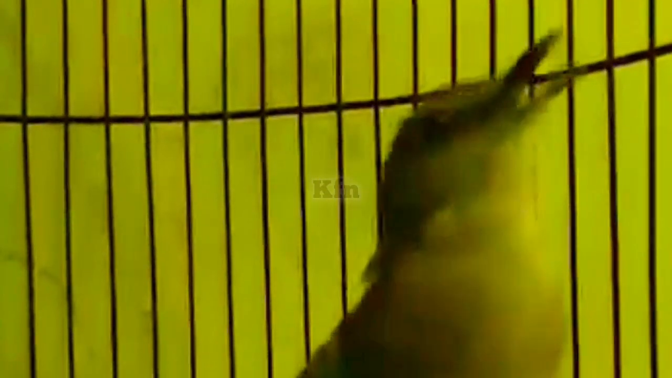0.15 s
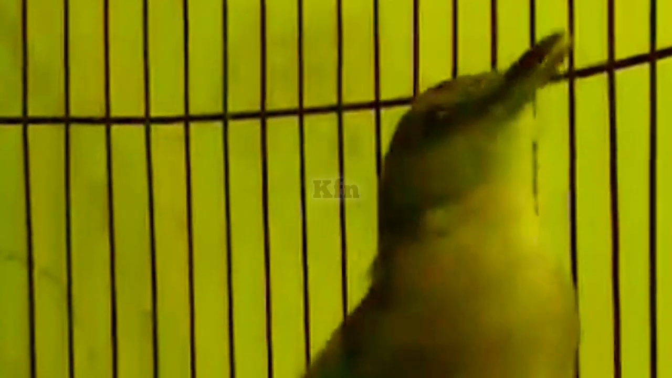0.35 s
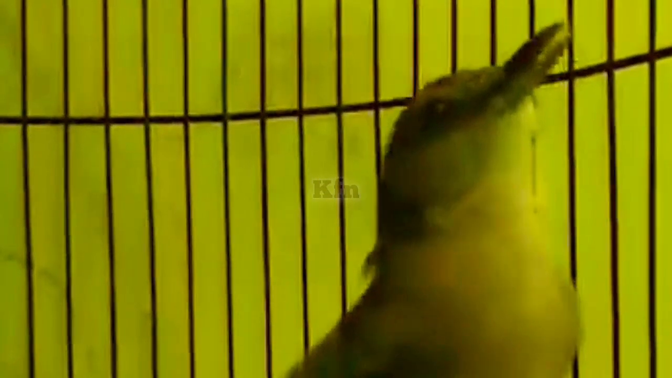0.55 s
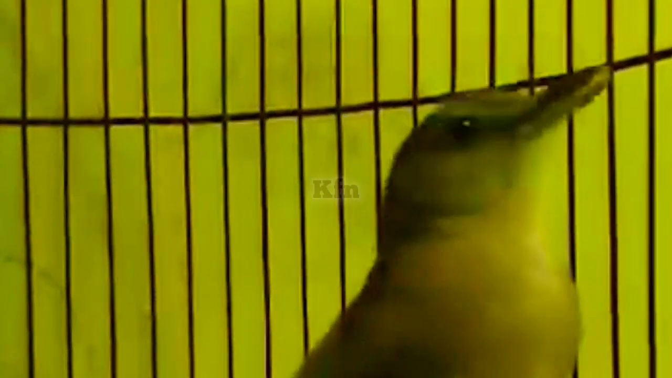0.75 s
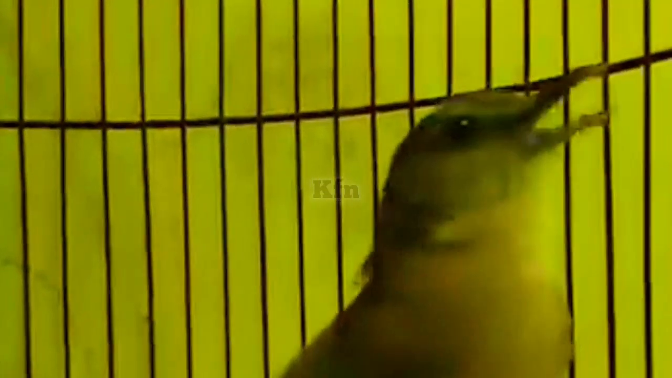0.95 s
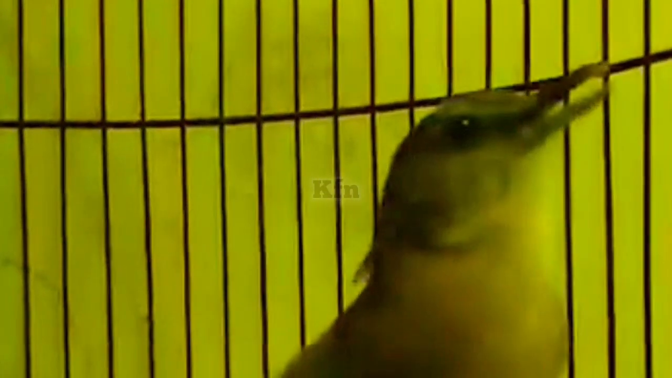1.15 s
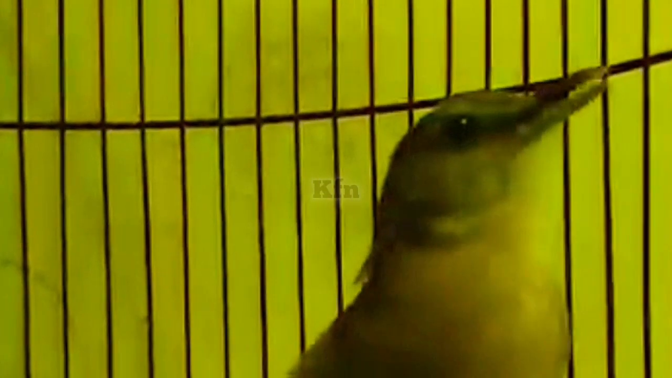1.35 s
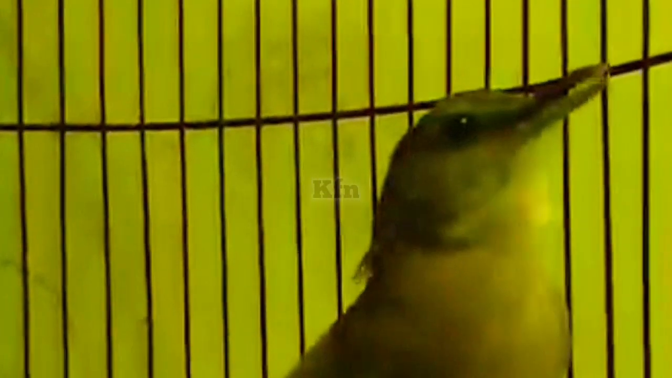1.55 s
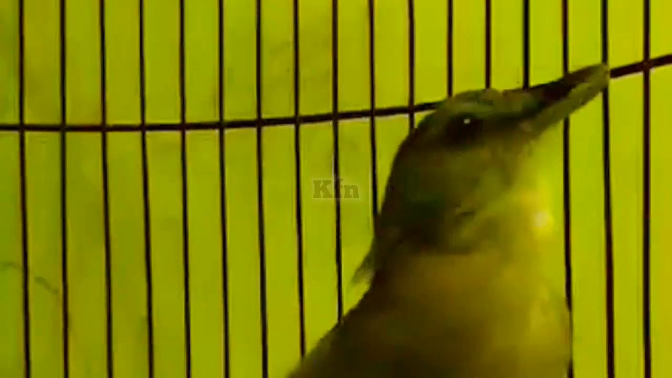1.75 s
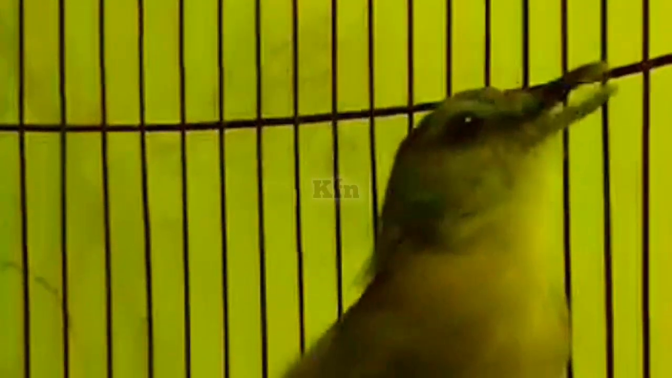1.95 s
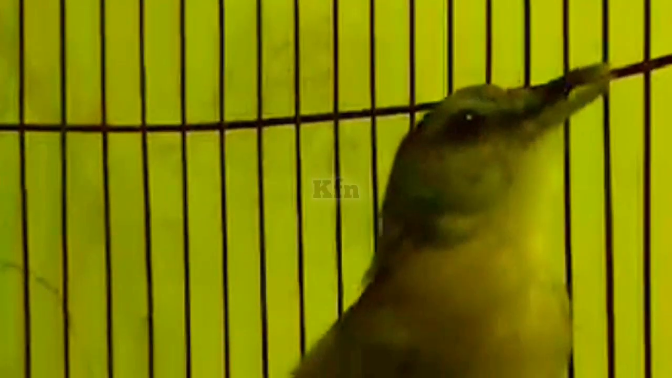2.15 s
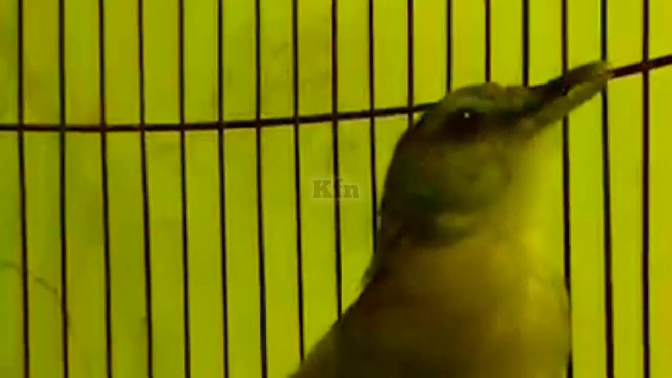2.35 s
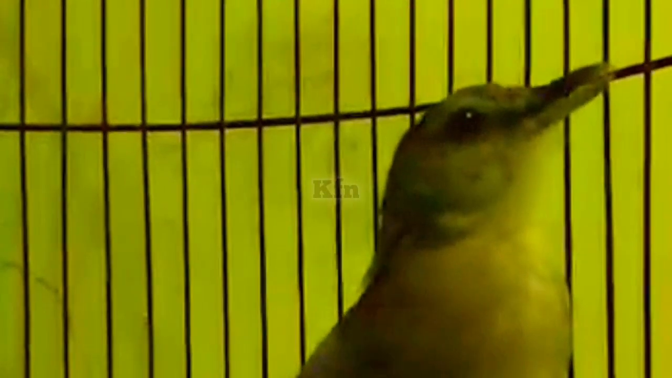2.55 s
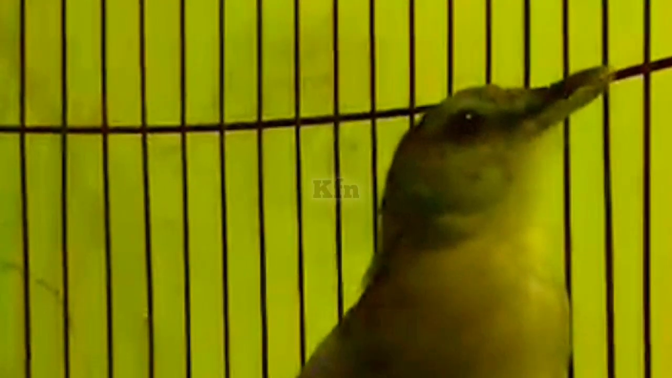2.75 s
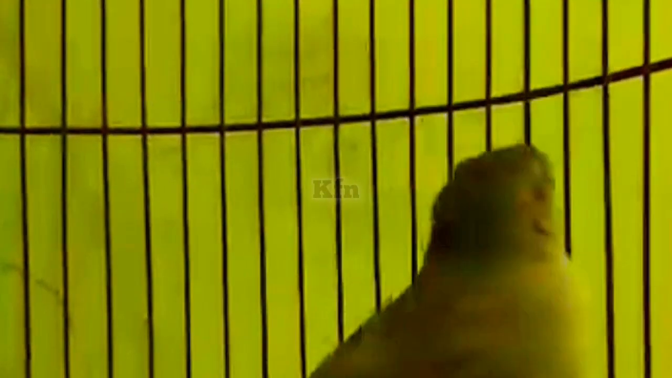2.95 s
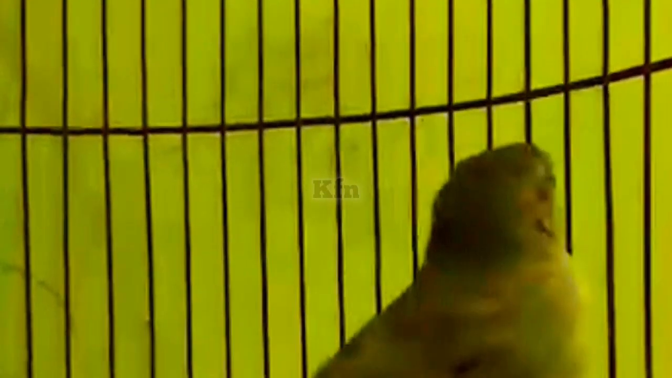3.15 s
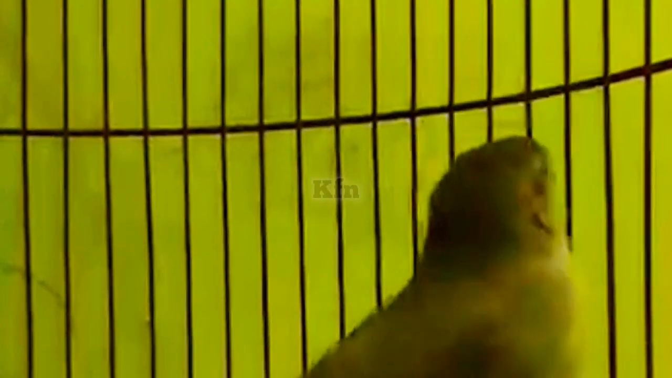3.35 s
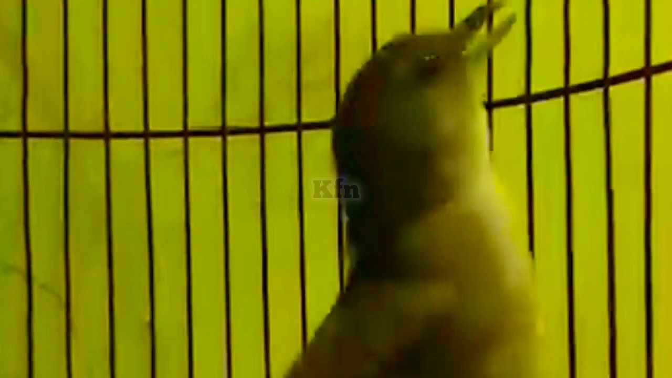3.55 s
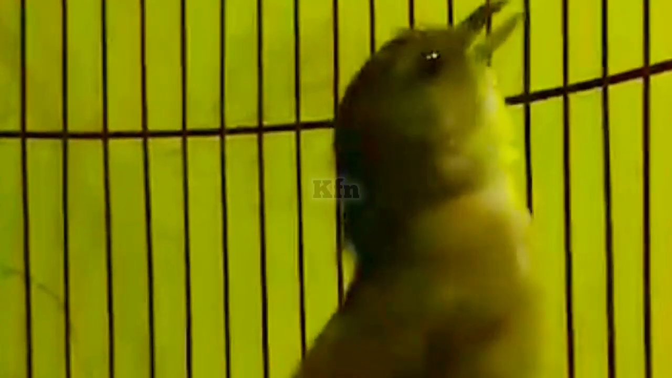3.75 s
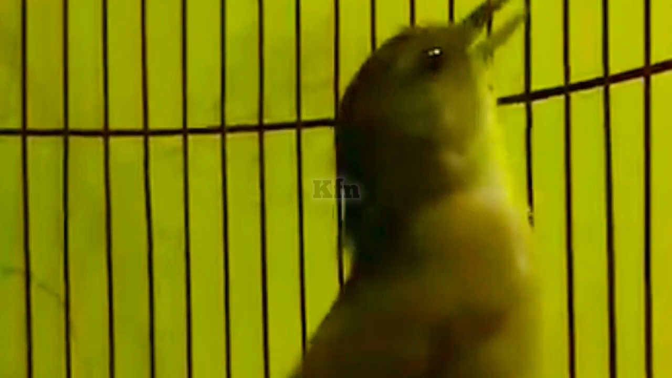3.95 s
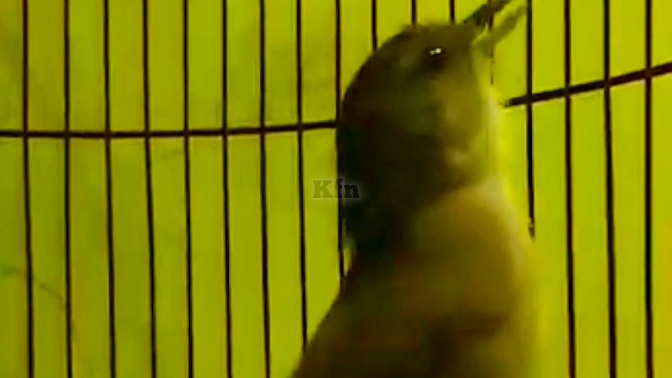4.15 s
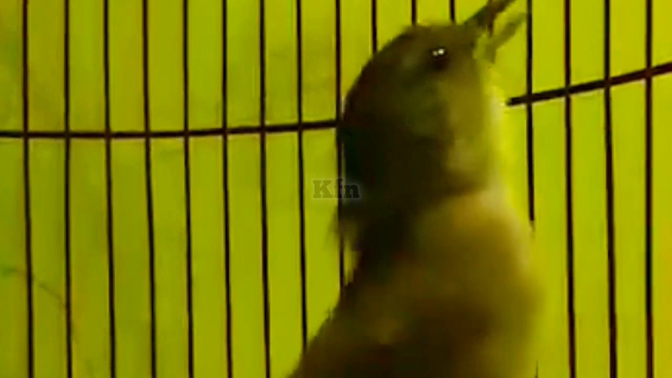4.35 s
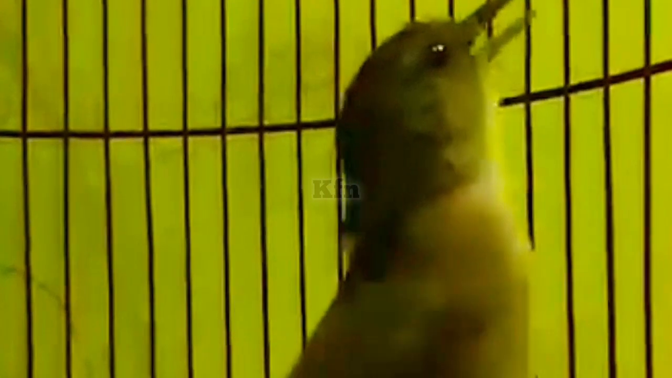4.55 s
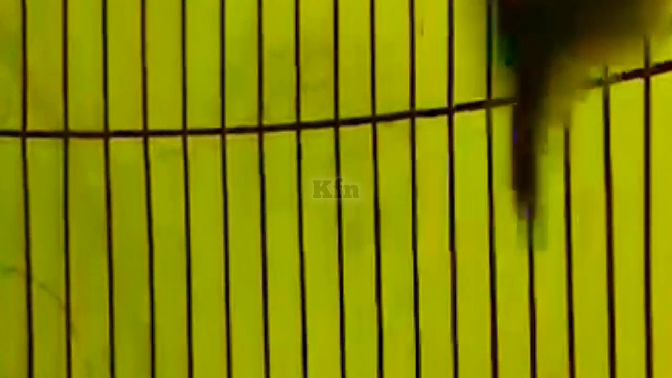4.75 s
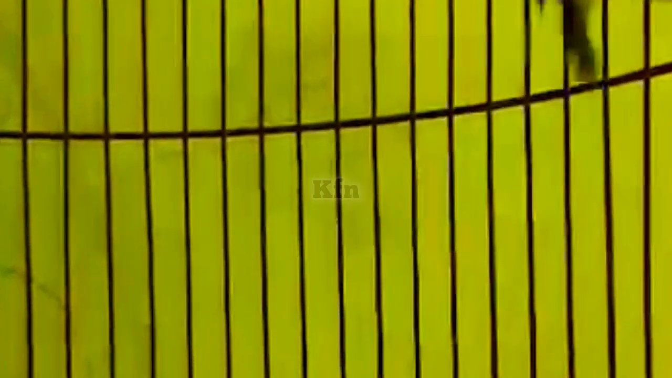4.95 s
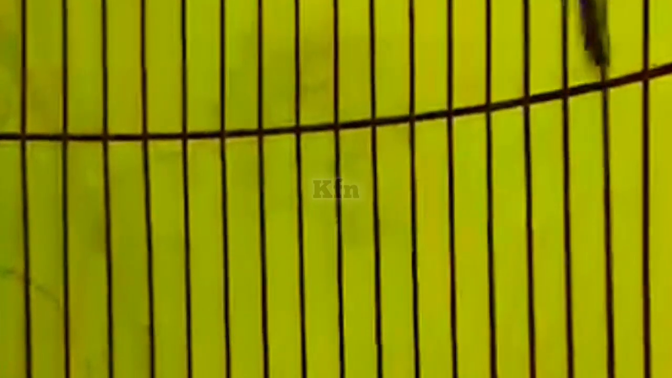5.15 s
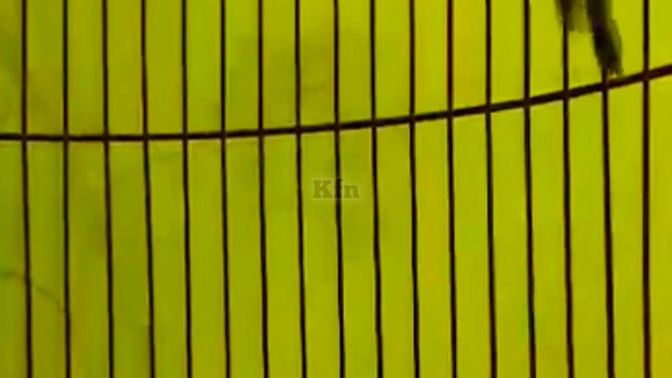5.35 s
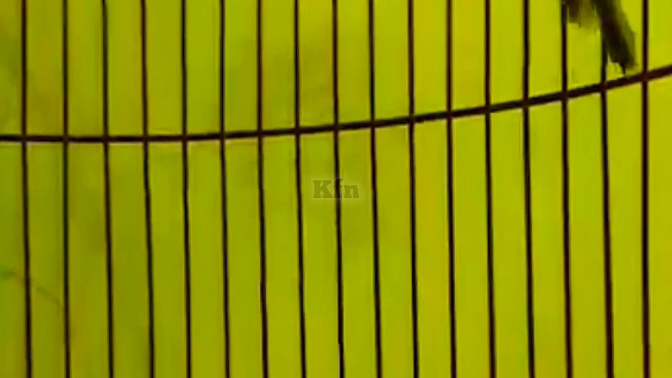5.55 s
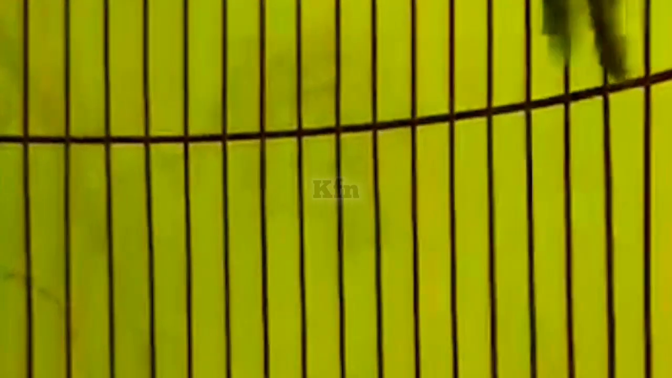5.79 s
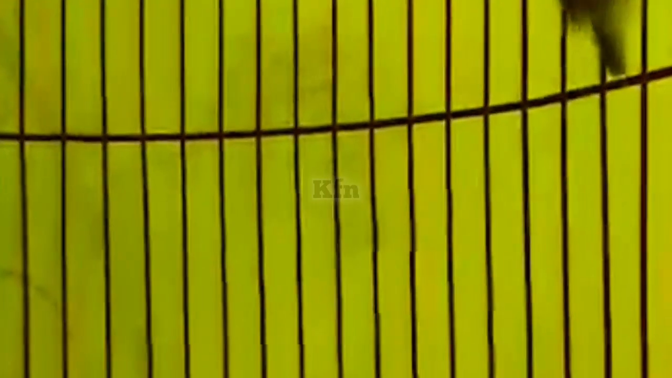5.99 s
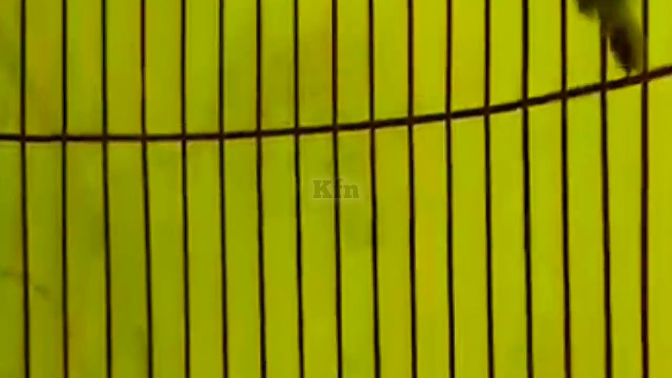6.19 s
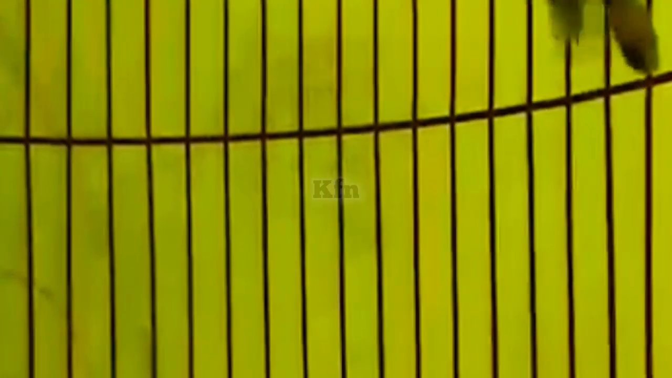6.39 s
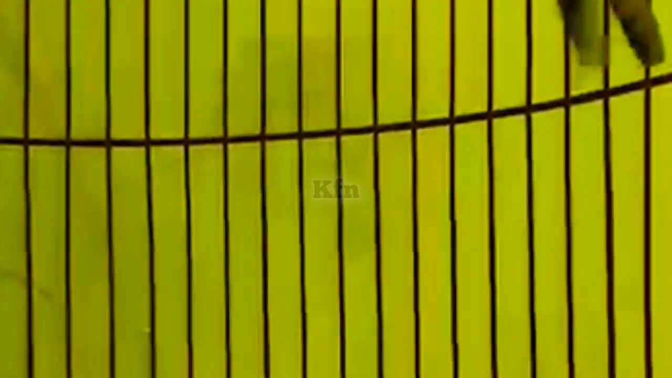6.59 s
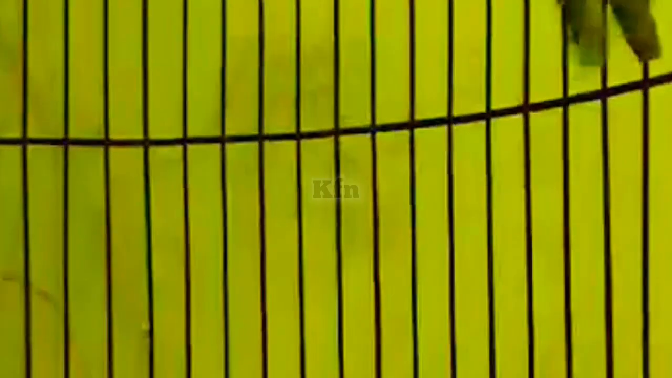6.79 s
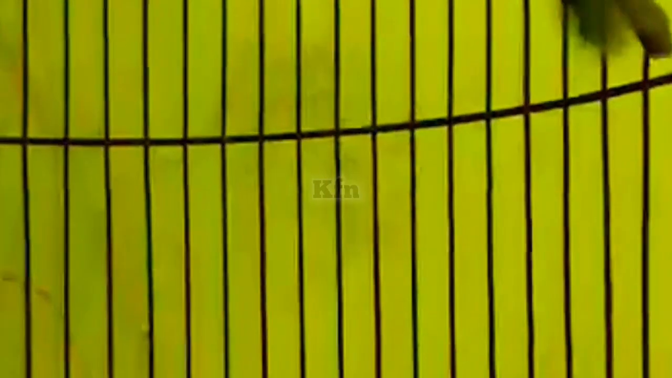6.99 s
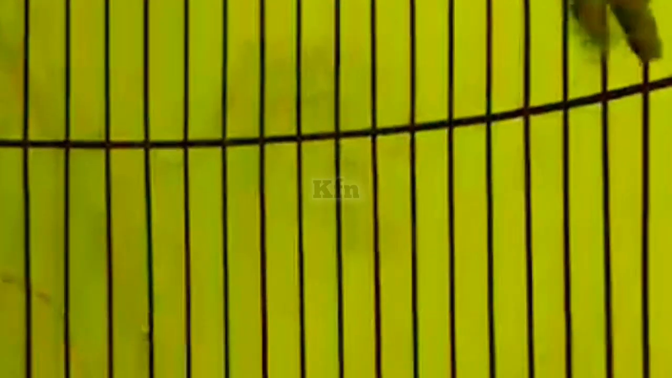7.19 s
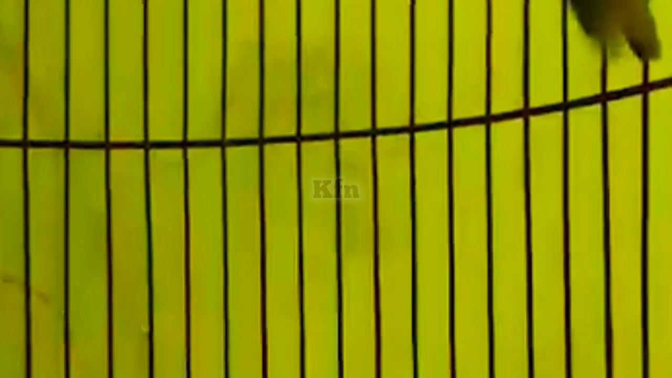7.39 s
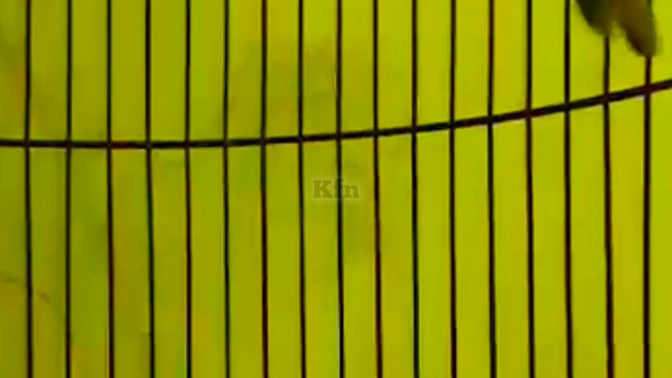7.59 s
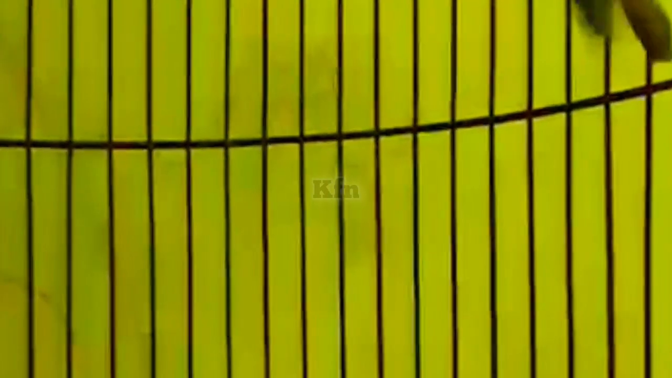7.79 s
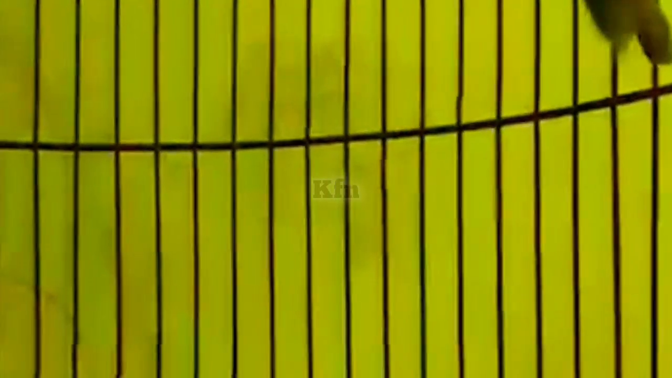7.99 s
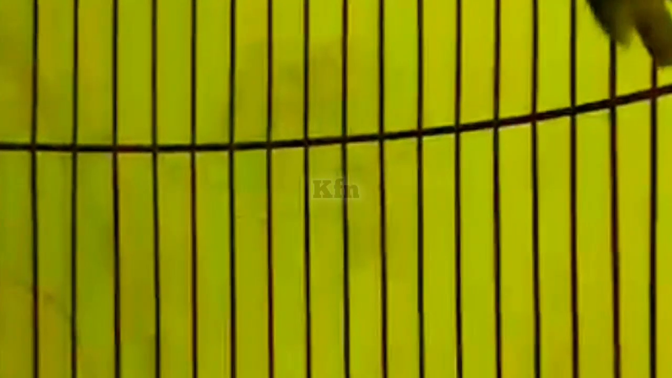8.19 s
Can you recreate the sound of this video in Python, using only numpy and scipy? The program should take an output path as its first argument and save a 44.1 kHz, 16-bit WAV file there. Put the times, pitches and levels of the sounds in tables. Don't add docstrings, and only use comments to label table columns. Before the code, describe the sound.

A small caged bird whistles close to the microphone in a hard, echoing room. A clear rising note opens at 0 s, a short low drop follows at 0.5, a flicked falling whistle at 1.0 and a dipping, climbing one at 1.6. Faint distant birds give short slurs between about 2 and 3 s. Two dull, quick chips come at 3.4, then a humped falling note at 3.7 with rustle and a tiny overload crackle, and a strong rise at 4.2. From 4.75 to 5.15 the bird hops: claws scratch, wires clank, and the cage hums faintly afterwards. A low drop follows at 5.2, a loud stepped fall at 5.6, a strong dip-and-rise at 6.1, a long fall at 6.9 and a soft drop at 7.8. Distant chirps answer near 8 s. Quiet chatter, feather rustle and a low machine drone surging through the wall lie underneath.

```python
import sys
import numpy as np
from scipy import signal
from scipy.fft import rfft, irfft, next_fast_len
from scipy.io import wavfile
from scipy.ndimage import uniform_filter1d, minimum_filter1d, map_coordinates

SR = 44100
rng = np.random.default_rng(int(sys.argv[2]) if len(sys.argv) > 2 else 0)


def gain_from_decibels(decibels):
    exponent = np.asarray(decibels, float) / 20
    return 10 ** exponent


def bounce(signal):
    frames = np.transpose(np.atleast_2d(signal))
    limited = np.clip(frames, -1, 1)
    pcm = np.round(limited * 32767).astype(np.int16)
    wavfile.write(sys.argv[1], SR, pcm)


N = 362943

# [t/s, f/Hz]
RISERS = [
    [(-.03, 1771), (0, 1939), (.03, 2087), (.11, 2451), (.145, 2692), (.19, 2821)],
    [(1.597, 2129), (1.63, 2014), (1.7, 1850), (1.73, 1681), (1.765, 1745), (1.795, 1667), (1.87, 2270),
     (1.92, 2395), (1.955, 2266)],
    [(4.24, 2043), (4.32, 1935), (4.37, 1928), (4.41, 2128), (4.46, 2316), (4.5, 2532), (4.555, 2535)],
    [(6.138, 2023), (6.18, 1933), (6.23, 2009), (6.33, 2310), (6.375, 2459), (6.405, 2717), (6.425, 2646)],
]
# [level/dB, swell/dB after 1/3, 2/3 and all of the note, top overtone gain/dB]
RISER_PUSH = [
    (-10.5, -1.5, -3, -3.5, 13),
    (-10.5, -3.5, 3, -5.5, 2),
    (-7, -2, -4.5, -9.5, 3.6),
    (-5.5, -5.5, -9, -13, 11),
]


def risers():
    return sing(RISERS, RISER_PUSH, attack=.019, opening=0.84, release=0.028, close=.9)


# [t/s, f/Hz]
FALLERS = [
    [(.962, 2774), (.995, 2711), (1.022, 3214), (1.065, 2599), (1.095, 2576), (1.115, 2244), (1.145, 2372),
     (1.193, 2445)],
    [(3.69, 2687), (3.727, 2580), (3.741, 2940), (3.762, 3113), (3.782, 2726), (3.815, 2564), (3.86, 2387),
     (3.916, 2463)],
    [(5.584, 3047), (5.61, 2783), (5.65, 2923), (5.71, 2515), (5.745, 2335), (5.785, 2564), (5.803, 2558)],
    [(6.905, 3036), (6.935, 2586), (6.985, 2541), (7.015, 2416), (7.05, 2190), (7.07, 2322), (7.105, 2360)],
]
# [level/dB, swell/dB after 1/3, 2/3 and all of the note, top overtone gain/dB]
FALLER_PUSH = [
    (-7, -9, -8.5, -5, 5),
    (-13.5, 5, 0.5, 0, -11.5),
    (-4.5, -2, -12.5, -5, 2.5),
    (-21.5, 5.5, 6, 4.5, -19),
]


def fallers():
    return sing(FALLERS, FALLER_PUSH, attack=.011, opening=0.95, release=0.011, close=0.69)


# [t/s, f/Hz]
DROPS = [
    [(.51, 2319), (.535, 2211), (.56, 1837), (.59, 1573)],
    [(5.238, 2348), (5.255, 2289), (5.275, 2058), (5.3, 1600), (5.32, 1447), (5.35, 1400)],
    [(7.815, 2270), (7.845, 1999), (7.87, 1748), (7.9, 1577)],
]
# [level/dB, swell/dB after 1/3, 2/3 and all of the note, top overtone gain/dB]
DROP_PUSH = [
    (-17, 3.72, 3.6, 0.5, 4),
    (-18, 5, 3.5, 11, 0),
    (-19, 2.6, 2.3, 8, -9),
]


def drops():
    return sing(DROPS, DROP_PUSH, attack=.021, opening=.88, release=0.016, close=0.73)


# [t/s, f/Hz]
CHIPS = [
    [(3.402, 2133), (3.415, 1930), (3.44, 1964)],
    [(3.47, 2113), (3.49, 1903)],
]
# [level/dB, swell/dB after 1/3, 2/3 and all of the note, top overtone gain/dB]
CHIP_PUSH = [
    (-17, -2.5, -5.5, -3.5, -29),
    (-11, 0, -1, -0.5, -18),
]


def chips():
    return sing(CHIPS, CHIP_PUSH, attack=.01, opening=1.2, release=0.019, close=0.76)


def sing(paths, pushes, attack, opening, release, close):
    out = np.zeros(N)
    for path, push in zip(paths, pushes):
        rows = phrase(path, push, attack, opening, release, close)
        note = whistle(rows, glide=.011, bright_db=push[-1], waver=.0035)
        add(out, rows[0][0], note)
        add(out, rows[0][0], gain_from_decibels(-4.5) * room(note, onset=0.018))
    return out


def phrase(path, push, attack, opening, release, close):
    faint_db = -27.5
    s, hz = np.transpose(path)
    breath_db = push[0] + np.interp(s, np.linspace(s[0], s[-1], num=4), [0, *push[1:-1]])
    level_db = breath_db + 26.5 * np.minimum(np.log2(hz / 2113), 0)
    first, last = level_db[0], level_db[-1]
    return [(s[0] - attack, opening * hz[0], first + faint_db),
            (s[0] - attack / 2, (1 + .3 * (opening - 1)) * hz[0], first + 0.35 * faint_db),
            *zip(s, hz, level_db),
            (s[-1] + release / 2, (1 + close / 2) / 1.5 * hz[-1], last + 0.81 * faint_db),
            (s[-1] + release, close * hz[-1], last + 0.84 * faint_db)]


OVERTONES = [-18.5, -28.5, -38, -45.5, -49.5, -61.5]
# [f/Hz, level/dB]
BEAK = [(1200, -24.5), (1600, -11), (2200, 4.5), (3000, 7), (3700, -5), (4500, -13.5), (5500, -5.5),
        (7500, -6.5), (10000, -4), (16000, -4.5)]


def whistle(rows, glide, bright_db, waver):
    s, hz, db = np.transpose(rows)
    t = np.arange(s[0], s[-1], 1 / SR)
    hz = np.interp(t, s, hz)
    hz = uniform_filter1d(hz, max(round(glide * SR), 1), mode="nearest")
    hz = hz * (1 + waver * wobble(len(t), 70.08))
    turn = 2 * np.pi * np.cumsum(hz) / SR
    tone = np.sin(turn)
    open_db = bright_db + 22 * np.log2(hz / 2300)
    open_db = open_db - 26 * np.exp(-(t - s[0]) / 0.022)
    for k, level in enumerate(OVERTONES, 2):
        level = level + open_db * (k - 1) / len(OVERTONES)
        level = level + 1.1 * k * wobble(len(t), 40)
        beak_db = along(BEAK, k * hz) - along(BEAK, hz)
        breathy = 1 + .3 * (k - 1.3) * wobble(len(t), 260)
        audible = k * hz < SR / 2
        tone = tone + audible * gain_from_decibels(level + beak_db) * breathy * np.sin(k * turn)
    to_edge = np.minimum(t - s[0], s[-1] - t)
    edges = np.sin(np.pi / 2 * np.clip(to_edge / 0.002, 0, 1)) ** 2
    loudness = uniform_filter1d(np.interp(t, s, gain_from_decibels(db)), SR // 300, mode="nearest")
    return np.sqrt(2) * loudness * edges * tone


# [f/Hz, t60/s]
ROOM = [(300, 0.12), (1800, 0.45), (2400, 0.59), (3000, 0.46), (6000, 0.36), (10000, 0.42), (16000, 0.5)]
# [delay/s, level/dB]
WALLS = [(.004, -3.5), (.009, -1), (0.013, -4), (.021, -10.5), (0.025, -10.5), (.043, -9.5), (.058, -10.5),
         (.074, -12.5)]


def room(x, onset):
    hz, t, z = signal.stft(rng.standard_normal(SR * 3 // 4), SR, nperseg=256)
    decay = gain_from_decibels(-60 * t / along(ROOM, hz)[:, None])
    tail = signal.istft(z * decay, SR, nperseg=256)[1]
    tail = tail * (1 - np.exp(-np.arange(len(tail)) / SR / onset))
    tail = tail / np.linalg.norm(tail)
    for delay, db in WALLS:
        tail[round(delay * SR)] += gain_from_decibels(db - 2.5) * rng.choice([-1, 1])
    return signal.fftconvolve(x, tail)


# [t/s, peak level/dB, scratch level/dB, bright bars level/dB, frame level/dB]
HOPS = [(4.75, -25, -7, -24, 1), (4.824, -25, -3.5, -5, -9.5), (4.845, -21, -3, -5, -23),
        (4.874, -30, -7.5, -18.5, -16.5), (4.79, -38.5, 0.5, -12, -8.5), (4.905, -36, 2, -11, -8.5),
        (4.938, -31, -0.5, -32, -15), (4.969, -22.5, -2.5, -2, -22.5), (4.985, -21.5, -3.5, 10, -10),
        (4.998, -33.5, -11.5, 5, -11.5), (5.029, -42, -5.5, 1.5, -5), (5.07, -49, -7, -5.5, -5),
        (5.148, -40, 0, -8.5, -19.5)]
# [f/Hz, level/dB, t60/s]
BARS = [(2190, -5, .6), (3670, -2, .65), (5360, -4, .4), (7620, -9, .35), (9600, -14, .25)]
# [f/Hz, level/dB, t60/s]
FRAME = [(960, -2.5, 0.087), (1306, -10, 0.058), (1600, 5, 0.055), (1930, -24, 0.2), (505, -19.5, 0.26)]
# [f/Hz, level/dB per Hz]
SCRATCH = [(150, -56), (400, -17), (1000, -7.5), (2000, -4), (2700, -17.5), (3600, -7), (4400, -23.5),
           (9400, -25), (16000, -38.5)]


def hops():
    out, t = np.zeros(N), np.arange(SR // 4) / SR
    for s, db, scratch_db, bars_db, frame_db in HOPS:
        hit = np.zeros(SR * 2 // 5)
        add(hit, 0, gain_from_decibels(bars_db - 19) * ring(BARS, attack=.004, spread=.012, count=5))
        add(hit, 0, gain_from_decibels(frame_db - 0.5) * ring(FRAME, attack=0.0063, spread=0.015, count=3))
        scrape = (1 - np.exp(-t / .004)) * gain_from_decibels(-60 * t / .1 + 3 * wobble(len(t), 200))
        add(hit, 0, gain_from_decibels(scratch_db - 2.5) * scrape * noise(SCRATCH, len(t), patchy_db=-1.0))
        add(out, s, gain_from_decibels(db) * hit)
        add(out, s, gain_from_decibels(db - 5.0) * room(hit, onset=0.038))
    return out


# [f/Hz, level/dB, t60/s]
HUM = [(314, 8, 0.84), (337.3, 1.5, 2.08), (421, -7.5, 4.4), (1115, 0, 2.5)]
# [t/s, level/dB]
HUM_BLOWS = [
    (4.99, -48),
    (5.031, -47.5),
    (5.062, -49.5),
]


def cage_hum():
    out = np.zeros(N)
    for s, db in HUM_BLOWS:
        add(out, s, gain_from_decibels(db) * ring(HUM, attack=.006, spread=.022))
    return out


def ring(modes, attack, spread, count=4):
    longest = max(mode[2] for mode in modes)
    t = np.arange(round(.8 * SR * longest)) / SR
    tones = np.zeros(len(t))
    for hz, db, t60 in modes:
        bars = hz * (1 + spread * rng.standard_normal((count, 1)))
        waves = np.sin(2 * np.pi * (bars * t + rng.random((count, 1))))
        tones += gain_from_decibels(db - 5.0 - 60 * t / t60) * waves.sum(axis=0)
    return tones * (1 - np.exp(-t / attack))


# [t/s, length/s, start f/Hz, f/Hz at the loudest, level/dB]
FAR = [(0.846, 0.074, 2410, 1505, -49.5), (1.365, 0.052, 3380, 3470, -60), (1.927, 0.077, 2920, 2886, -54),
       (2.154, 0.043, 2760, 2626, -41.5), (2.399, 0.081, 2243, 1740, -42.5),
       (2.663, 0.075, 2360, 1725, -42.5), (2.898, 0.059, 2580, 1703, -41), (3.128, 0.33, 2730, 2970, -66),
       (0.908, 0.05, 600, 588, -64), (2.708, 0.071, 1320, 1317, -66), (0.093, 0.034, 1420, 1304, -57),
       (4.575, 0.056, 1401, 1363, -66), (6.006, 0.056, 1682, 1446, -50.5), (7.215, 0.015, 1535, 1400, -55),
       (7.49, 0.028, 1804, 1360, -55), (7.554, 0.018, 2460, 1770, -43), (8.044, 0.04, 2122, 1733, -34),
       (8.117, 0.023, 3010, 2317, -27.5), (8.171, 0.038, 2600, 2215, -39), (2.468, 0.022, 1860, 2260, -43),
       (2.722, .031, 1813, 2355, -39.5)]


def far_birds():
    out = np.zeros(N)
    for s, length, start, loudest, db in FAR:
        end = loudest + 0.11 * (loudest - start)
        rows = [(0, start, db - 8), (0.8 * length, loudest, db), (length, end, db - 10.5)]
        note = whistle(rows, glide=.008, bright_db=-60, waver=.012)
        add(out, s, gain_from_decibels(-0.5) * note)
        add(out, s, gain_from_decibels(-3.5) * room(note, onset=0.0054))
    return out


# [t/s, level/dB]
STIR = [(0, 11), (.3, -1.5), (1.9, 3), (2.2, 6.5), (2.7, 1), (3.1, -2), (3.58, 23.5), (3.95, 4.5),
        (4.72, 9.5), (5.0, 19), (5.5, 16.5), (5.65, 12), (6.8, -9.5), (7.15, 3), (7.5, -11), (7.75, 12),
        (8.23, 15)]
# [f/Hz, level/dB per Hz]
AIR = [(25, -17.5), (80, -19), (300, -13.5), (750, -26.5), (1230, -17), (1790, -15), (2410, 3), (2750, -17),
       (3700, -16.5), (4200, -35), (5280, -21.5), (6740, -40), (10000, -39), (16000, -59.5)]
# [f/Hz, level/dB]
HOLLOW = [(300, -51.5), (430, -8), (530, -0.5), (590, -4.5), (700, -54.5)]
# [f/Hz, level/dB]
FEATHERS = [(30, -12.5), (70, -12), (200, 2.5), (500, -5), (1000, -8), (4000, -17), (10000, -36.5),
            (16000, -48.5)]


def air():
    stir_db = curve(STIR)
    still = gain_from_decibels(0.28 * stir_db - 52.5) * noise(AIR, N, patchy_db=2.5)
    street = gain_from_decibels(0.6 * stir_db - 71) * noise(HOLLOW, N, patchy_db=2.0)
    rustle = gain_from_decibels(1.23 * stir_db - 80) * noise(FEATHERS, N, patchy_db=1.8)
    return still + street + rustle


# [t/s, level/dB]
SURGES = [(0, -61.5), (1.301, -64.5), (1.7, -64), (2.01, -62.5), (2.58, -69), (2.9, -70), (3.21, -66.5),
          (3.65, -52), (4.05, -63), (4.35, -62.5), (5.68, -67.5), (6.25, -66), (7.1, -74), (7.88, -69),
          (8.201, -67)]
# [f/Hz, level/dB]
DRONE = [(30, -31), (55, -17), (70, -4.5), (82, -19), (120, -40.5), (300, -86.5)]


def low_surges():
    t = np.arange(N) / SR
    half_hold_s, slope_db_per_s = 0.14, 88.5
    surges_db = [db - slope_db_per_s * np.maximum(abs(t - s) - half_hold_s, 0) for s, db in SURGES]
    return gain_from_decibels(np.max(surges_db, axis=0)) * noise(DRONE, N, patchy_db=-5.0)


def noise(spectrum, n, patchy_db):
    z = signal.stft(rng.standard_normal(n + 1024), nperseg=512)[2]
    field = uniform_filter1d(rng.standard_normal(z.shape), size=5, axis=0)
    field = uniform_filter1d(field, size=10, axis=1)
    white = signal.istft(z * gain_from_decibels(patchy_db * unit(field)), nperseg=512)[1]
    return unit(colour(white, spectrum)[:n])


def colour(x, spectrum):
    m = next_fast_len(x.shape[-1] + SR // 4)
    return irfft(rfft(x, m) * gain_from_decibels(along(spectrum, np.fft.rfftfreq(m, 1 / SR))), m)


def wobble(n, rate):
    knots = rng.standard_normal(int(n * rate / SR) + 4)
    return map_coordinates(knots, [np.arange(n) * rate / SR])


def unit(x):
    return x / np.sqrt(np.mean(x ** 2) + 1e-20)


def along(points, hz):
    f, v = np.transpose(points)
    return np.interp(np.log(hz + 1), np.log(f + 1), v)


def curve(rows):
    return np.interp(np.arange(N) / SR, *np.transpose(rows))


def add(track, s, x):
    start = round(s * SR)
    x = x[max(-start, 0):]
    part = track[max(start, 0):][:len(x)]
    part += x[:len(part)]


def scene():
    song = risers() + fallers() + drops() + chips()
    return (song + hops() + cage_hum() + far_birds() + air() + low_surges())[None]


# [f/Hz, level/dB]
CAPSULE = [(20, 0), (7000, 0), (8700, -15), (9900, 10), (10900, -11), (12500, -14), (13600, -5),
           (14700, 12), (15700, 6), (15900, -40), (22000, -60)]


def microphone(dry):
    heard = colour(dry, CAPSULE)[:, :N]
    hiss_band = signal.butter(2, (10800, 14200), "band", fs=SR, output="sos")
    heard = heard + gain_from_decibels(-87) * signal.sosfilt(hiss_band, rng.standard_normal(N))
    bent = heard + gain_from_decibels(-36.5) * heard ** 2 + gain_from_decibels(-55.5) * heard ** 3
    return signal.sosfilt(signal.butter(2, 35, "high", fs=SR, output="sos"), bent)


# [t/s, level/dB]
OVERLOADS = [
    (3.7569, -33),
    (3.7592, -37),
    (3.781, -40),
    (4.401, -37),
]


def limiter(bent):
    headroom = minimum_filter1d(np.minimum(1, .97 / (abs(bent) + 1e-9)), SR // 60, axis=1)
    held = bent * uniform_filter1d(headroom, SR // 60, axis=1)
    for s, db in OVERLOADS:
        add(held[0], s, gain_from_decibels(db) * np.diff(rng.standard_normal(12)))
    return held


def top_cut(x):
    return signal.sosfilt(signal.butter(12, 16350, fs=SR, output="sos"), x)


def record(dry):
    mix = limiter(microphone(dry))
    return top_cut(mix)


dry = scene()
out = record(dry)
bounce(out)
```